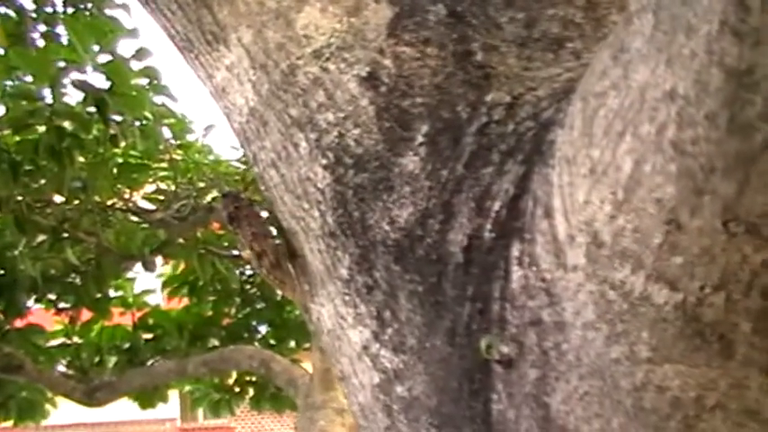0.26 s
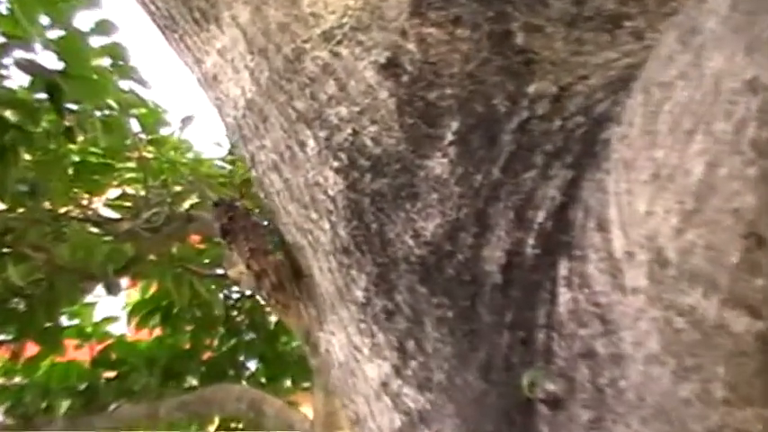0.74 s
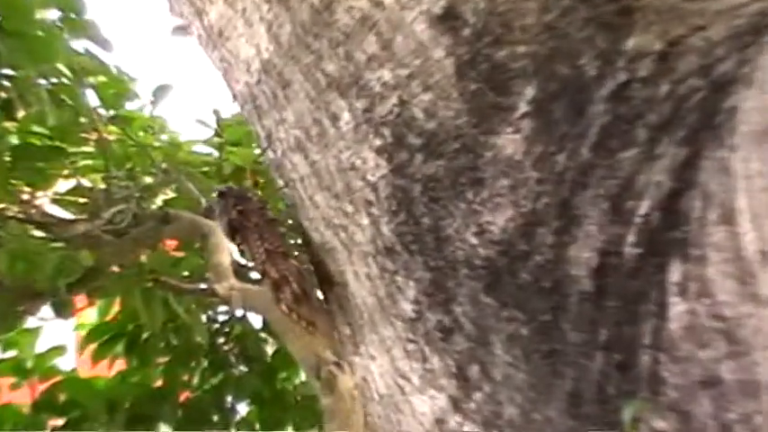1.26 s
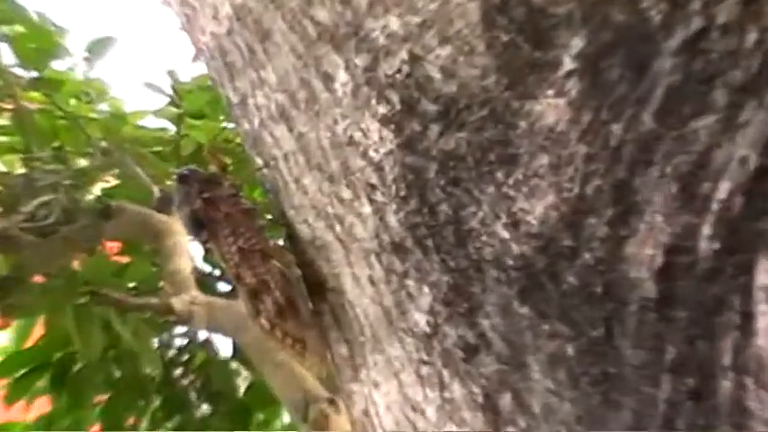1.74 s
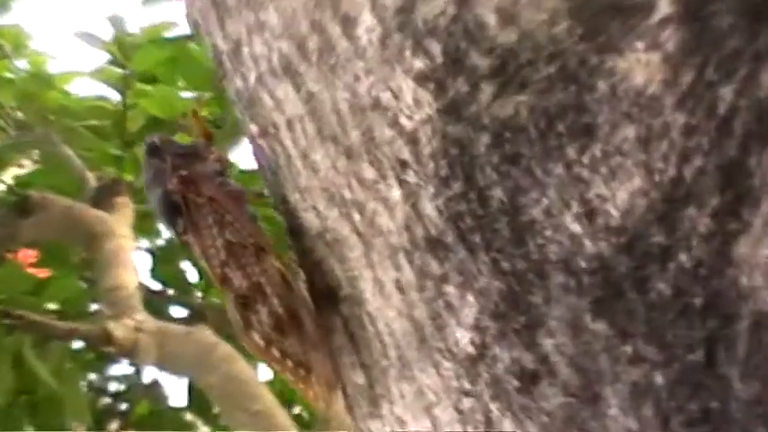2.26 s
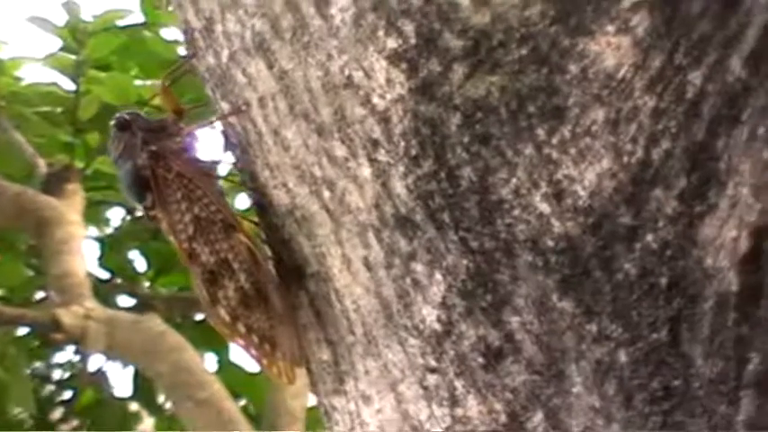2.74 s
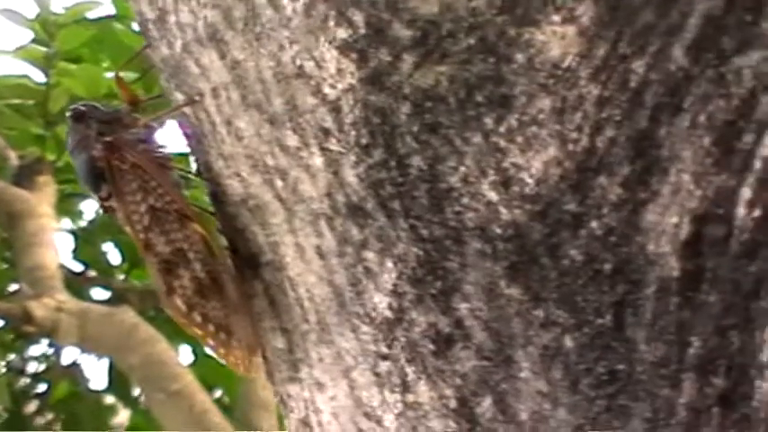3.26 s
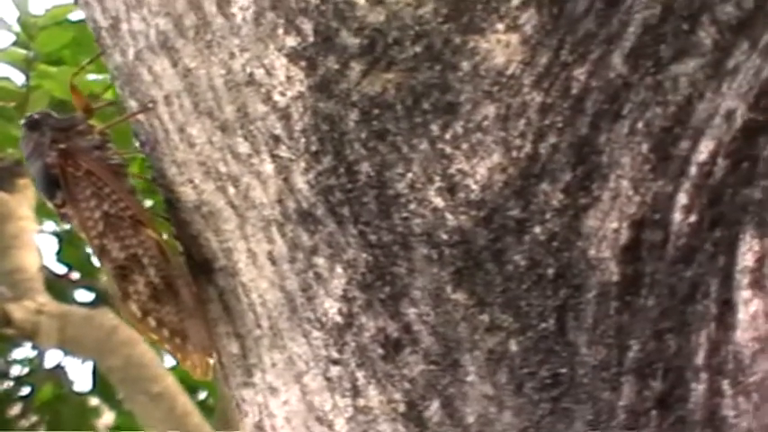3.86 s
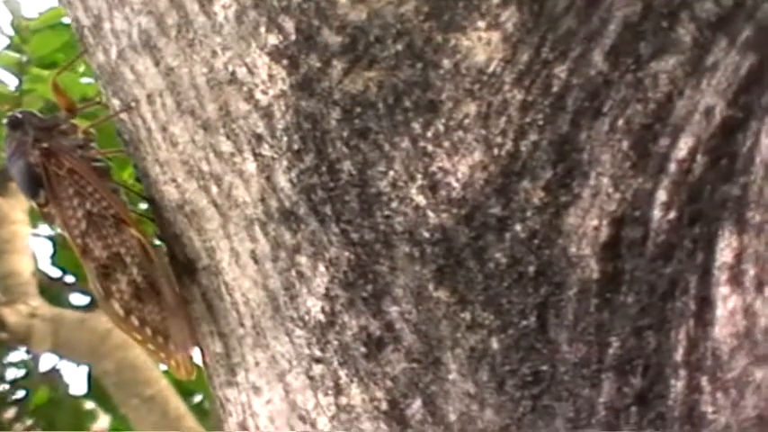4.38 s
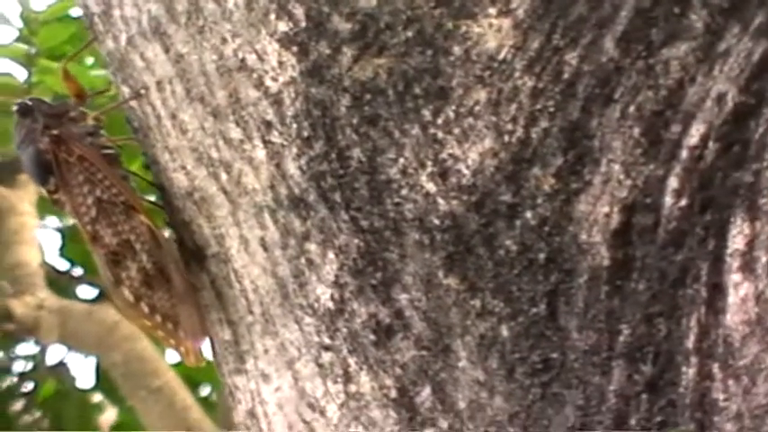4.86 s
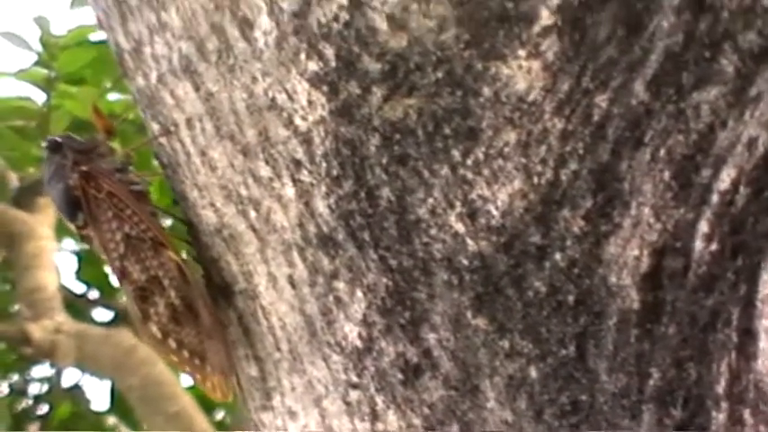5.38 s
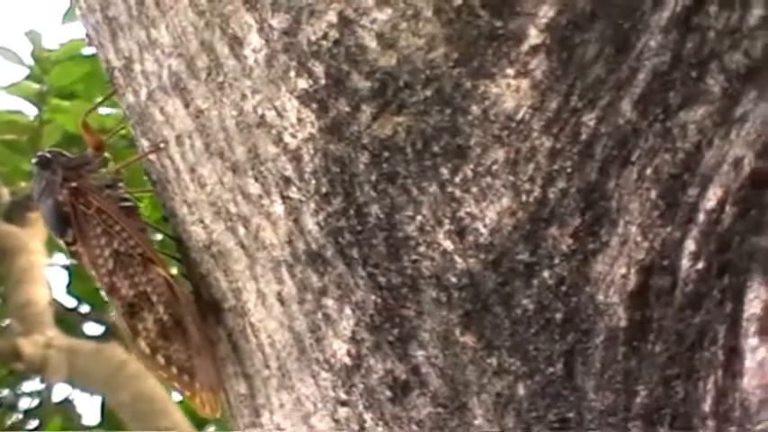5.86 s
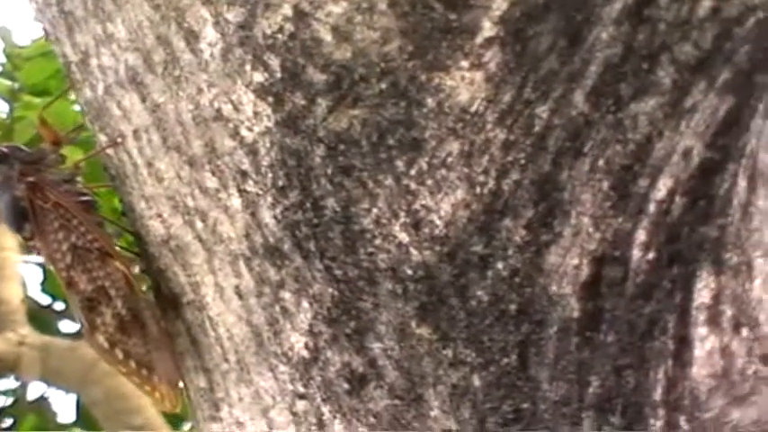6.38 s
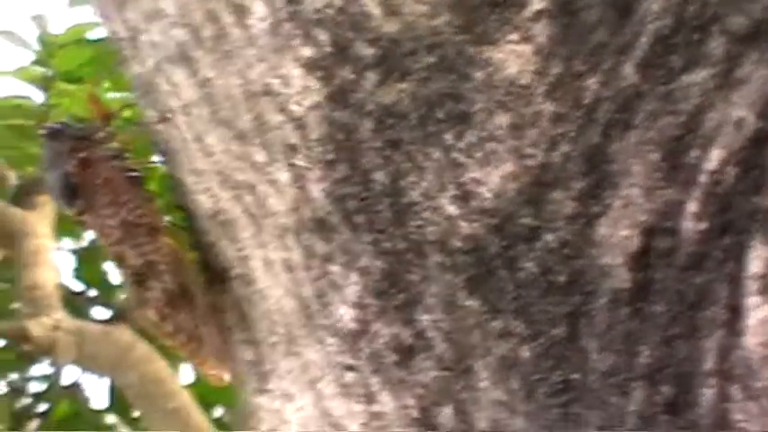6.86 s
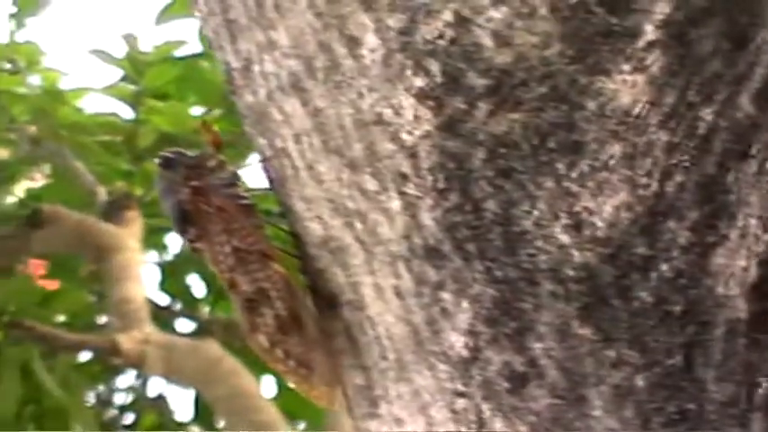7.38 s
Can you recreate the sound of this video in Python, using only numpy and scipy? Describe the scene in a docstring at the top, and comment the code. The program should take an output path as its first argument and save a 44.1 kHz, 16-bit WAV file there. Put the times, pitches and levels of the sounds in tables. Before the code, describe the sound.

Close bright insect clicks speed up into a steady rapid ticking outdoors, with distant cicadas hissing and soft tyre noise growing behind.

```python
"""On a tree trunk in a garden, close to the microphone, a cicada warms up its song with ever faster snaps.
Two tymbals take turns by bouts: each buckles, rings in damped modes, and pops back out about 3 ms later.
Fixed resonances of the nearby reflections prolong the snaps; trunk, leaves and a house wall return them
as decaying noise and an echo. Behind, filtered noise makes the far cicadas, the nearing car and the town;
wavering tones make a far motor."""
import sys
import numpy as np
from scipy import signal
from scipy.fft import rfft, irfft
from scipy.io import wavfile
from scipy.ndimage import uniform_filter1d

SR = 44100
rng = np.random.default_rng(int(sys.argv[2]) if len(sys.argv) > 2 else 0)


def persist_wave(psi):
    """Save psi, clipped to +-1, as 16-bit WAV."""
    counts = np.round(np.clip(psi, -1, 1) * 32767).astype(np.int16)
    wavfile.write(sys.argv[1], SR, np.atleast_2d(counts).T)


N = 336483  # samples in the scene


def undb(db):
    """Amplitude ratio: 20 dB for each factor of ten."""
    return 10 ** (np.asarray(db) / 20)


def unit(x):
    """Normalisation to an rms of 1."""
    return x / np.sqrt(np.mean(x ** 2))


def decay_60(time, t60):
    """Exponential decay: the amplitude falls by 60 dB in t60 (same unit as time)."""
    return np.exp(-np.log(1000) * time / t60)


def lowpass(x, hz, order=2):
    """Smooth loss of treble above a cutoff."""
    return signal.sosfilt(signal.butter(order, min(hz, SR / 2 - 1), fs=SR, output="sos"), x)


def highpass(x, hz, order=3):
    """Radiation efficiency: a small body radiates little bass."""
    return signal.sosfilt(signal.butter(order, hz, "high", fs=SR, output="sos"), x)


def colour(x, points):
    """Spectral shaping by a curve of (Hz, dB), straight on a logarithmic frequency axis."""
    hz, db = np.transpose(points)
    bins = np.maximum(np.arange(N // 2 + 1) * SR / N, 1)
    gain = undb(np.interp(np.log(bins), np.log(hz), db))
    return irfft(rfft(x) * gain, N)


def walk(rate):
    """Slow random modulation: levels held for 1 / rate seconds, smoothed twice, with an rms of 1."""
    hold = int(SR / rate)
    steps = np.repeat(rng.standard_normal(N // hold + 1), hold)
    smooth = uniform_filter1d(uniform_filter1d(steps, hold), hold)
    return unit(smooth[:N])


def stereo(mid, side, width):
    """Mid-side stereo: the side signal is added on the left and subtracted on the right."""
    return mid + width * side * np.array([[1], [-1]])


def wash(points, width):
    """Diffuse sound field: coloured, partly correlated stereo noise with an rms of 1."""
    mid, side = colour(rng.standard_normal((2, N)), points)
    return unit(stereo(mid, side, width))


def town():
    """Distant rumble: steady broadband noise dominated by bass."""
    # Each row: frequency in Hz, relative spectral density in dB.
    town_spectrum = [(20, -20), (42, 3), (72, -6), (102, 1), (140, -0.5), (200, 0.5), (270, 1.5), (340, -1),
                     (420, -7), (700, -20), (2000, -33), (16000, -55)]
    return wash(town_spectrum, width=0.2) * undb(-50)


def motor(flutter_rate=14):
    """Far drone: narrowband tones whose amplitude and phase waver at random, so each fades in and out."""
    # Each row: frequency in Hz, level in dB.
    drone_lines = [(44, -62.5), (102, -58), (126, -59.5), (172, -60), (228, -59), (272, -58), (325, -58.5)]
    t = np.arange(N) / SR
    drone = np.zeros(N)
    for hz, db in drone_lines:
        envelope = walk(flutter_rate) + 1j * walk(flutter_rate)
        drone += undb(db) * np.real(envelope * np.exp(2j * np.pi * hz * t))
    return drone


def car():
    """Tyre noise: broadband noise whose level grows as the car draws near."""
    # Each row: time in seconds, level in dB before a lift of 2.5 dB.
    approach = [(0.1, -56.5), (1.17, -55), (4.99, -50), (5.32, -45), (7.63, -38)]
    # Each row: frequency in Hz, relative spectral density in dB.
    tyre_spectrum = [(25, -7), (45, -6.5), (75, -10), (150, -5.5), (300, -3), (600, -1), (1100, -3),
                     (1550, -6.5), (1900, -12.5), (2500, -17.5), (4000, -23), (16000, -48)]
    level_db = np.interp(np.arange(N) / SR, *np.transpose(approach))
    return wash(tyre_spectrum, width=0.31) * undb(level_db + 2.5)


def chorus():
    """Far cicadas: incoherent songs merge into a hiss whose level wavers slightly."""
    # Each row: frequency in Hz, relative spectral density in dB.
    chorus_spectrum = [(1500, -14.5), (2700, 0), (3600, -4), (5200, 7), (6200, 5.5), (7500, 0), (9000, -10),
                       (10500, -14), (13000, -12), (16000, -21)]
    return wash(chorus_spectrum, width=0.19) * undb(-50 + .5 * walk(9))


def whine():
    """One far cicada: a band of noise, amplitude-modulated so that it swells and sinks."""
    # Each row: frequency in Hz, relative spectral density in dB.
    whine_spectrum = [(6000, -40), (7800, -8), (8800, 0), (9500, -9), (11500, -40)]
    return wash(whine_spectrum, width=.2) * undb(-66 + 4 * walk(8))


def background():
    """Superposition of the distant sources."""
    return town() + motor() + car() + chorus() + whine()


def twitches():
    """Alternating excitation: rows of snap time in seconds, tymbal whose turn it is, place in the bout."""
    # Snaps, driven alike because the ribs always give way at the same load. Each row: start in seconds.
    snap_times = [0.0451, 0.2771, 0.3995, 0.6151, 0.703, 0.7627, 0.8353, 0.9621, 1.218, 1.2684, 1.3645,
                  1.5055, 1.6749, 1.7346, 1.7754, 1.8526, 1.9094, 1.977, 2.1126, 2.206, 2.3447, 2.4044,
                  2.4641, 2.525, 2.576, 2.6221, 2.669, 2.729, 2.782, 2.8337, 2.9276, 2.9946, 3.061, 3.1195,
                  3.216, 3.2799, 3.3379, 3.3904, 3.4915, 3.5655, 3.6058, 3.6593, 3.7296, 3.776, 3.8268,
                  3.8855, 3.95, 4.0077, 4.0733, 4.1363, 4.1861, 4.2376, 4.298, 4.397, 4.4587, 4.5177,
                  4.6332, 4.696, 4.7554, 4.8305, 4.8803, 4.9394, 4.991, 5.0959, 5.1563, 5.265, 5.3344,
                  5.3829, 5.4335, 5.4913, 5.5467, 5.601, 5.6932, 5.7534, 5.8015, 5.863, 5.9088, 5.9647,
                  6.0305, 6.077, 6.1293, 6.1816, 6.2322, 6.3147, 6.3562, 6.4169, 6.4636, 6.516, 6.5702,
                  6.6153, 6.66, 6.7085, 6.757, 6.8141, 6.8546, 6.9049, 6.9415, 6.9995, 7.0407, 7.0847,
                  7.1136, 7.154, 7.2024, 7.2418, 7.2488, 7.2965, 7.3458, 7.4006, 7.4074, 7.4794, 7.5257,
                  7.5787]
    # Bouts, in which the tymbals take turns, tymbal 1 first. Each row: start in seconds.
    bout_starts = [0, .2, .5, 1.1, 1.6, 1.88, 2.3, 2.7, 3.1, 3.45, 3.8, 4.35, 4.73, 5.2, 5.52, 6.1, 6.55,
                   7.18, 7.404, 7.45, 7.55]
    times = np.sort(snap_times)
    bout = np.searchsorted(bout_starts, times)
    place = np.arange(len(times)) - np.searchsorted(bout, bout)
    return list(zip(times, bout % 2, place))


def ring(ms, hz, t60_ms, db, give_ms):
    """Modal excitation: damped modes start as the ribs give way; neighbours swing in opposite senses."""
    ms = np.maximum(ms, 0)  # silent before the onset
    size = (-1) ** np.arange(len(hz)) * undb(db)
    swings = decay_60(ms, t60_ms[:, None]) * np.sin(2 * np.pi * hz[:, None] * ms / 1000)
    onset = 1 - np.exp(-ms / give_ms)
    return size @ swings * onset


def knock(ms, tension):
    """Dull thorax knock: a damped resonance whose pitch rises as the muscle tightens."""
    hz, t60_ms, db = 1840 * tension ** .6, 16, -38.5
    return undb(db) * decay_60(ms, t60_ms) * np.sin(2 * np.pi * hz * ms / 1000)


def cicada(give_ms=0.16, radiation_hz=2900, tymbal_db=(0.7, 0.6)):
    """Snap-through buckling: each twitch buckles a tymbal, which pops back; one track per tymbal."""
    # Modes of each tymbal. Each row: frequency in Hz, 60 dB decay time in ms,
    # relative level on buckling in dB, relative level on popping out in dB.
    modes_0 = [(3426,3.8,-14.5,-63), (4255,3.4,-4,-17.5), (5360,2.3,3.0,-12), (5720,5.72,-1.5,-16),
               (5783,2.58,-3,-18), (9050,1.15,-1,-7.5), (10460,3.67,-8.5,-8), (13150,1.2,-16,-34)]
    modes_1 = [(4140,1.09,4,-5.5), (3988,2.56,2,-11), (4870,2.26,2,-15), (5340,6.26,-3.5,-17),
               (6110,3.16,-19,-21), (9405,1.19,3,0.9), (10500,3.7,-6,-3), (13100,0.44,2.5,2.5)]
    # The time from buckling to popping out shortens with warmth and with each snap of a bout.
    hold_ms, warming_ms_per_s, hurry_ms_per_snap = 3.12, .039, .018
    rise_per_s = .0004  # share of the pitch gained per second of warming
    scatter_db, detune, scatter_ms = .25, .003, .025  # random spread from snap to snap; detune is a share

    length = SR // 40
    ms = np.arange(length) * 1000 / SR
    tracks = np.zeros((2, N + SR))
    snaps = twitches()
    chance = rng.standard_normal((len(snaps), 4))
    for (start_s, side, place), (loud, tune, pop, late) in zip(snaps, chance):
        hold = hold_ms - warming_ms_per_s * start_s - hurry_ms_per_snap * place
        hold += scatter_ms * late
        hz, t60_ms, in_db, out_db = np.array((modes_0, modes_1)[side], float).T
        hz = hz * (1 + rise_per_s * (start_s - N / SR / 2) + detune * tune)  # rises about mid-scene
        buckle = ring(ms, hz, t60_ms, in_db, give_ms)
        rebound = ring(ms - hold, hz, t60_ms, out_db + scatter_db * pop, give_ms)
        snap = highpass(buckle + rebound, radiation_hz) + knock(ms, hold_ms / hold)
        start = int(start_s * SR)
        tracks[side, start:start + length] += snap * undb(tymbal_db[side] + scatter_db * loud)
    return tracks[:, :N]


def early_reflections(x):
    """Place resonance: fixed early reflections near the trunk colour each snap and ring on."""
    # Each row: frequency in Hz, 60 dB decay time in seconds, level in dB.
    place_modes = [(4304, 0.017, -4.5), (4696, 0.019, -6.5), (5225, 0.052, -2.5), (5466, 0.039, -0.5)]
    t = np.arange(SR // 10) / SR
    response = np.zeros(len(t))
    for hz, t60, db in place_modes:
        decay = decay_60(t, t60)
        response += undb(db) * 2 * decay / decay.sum() * np.cos(2 * np.pi * hz * t)  # gain db at resonance
    return x + signal.fftconvolve(x, response)[:N]


def garden(x, near_db=-16, near_t60=0.053, far_db=-20.5, far_t60=0.26, width=0.42,
           dull_hz=9000, wall_hz=6000):
    """Scattering and reflection: quick trunk and branch scatter, a faint leaf tail, one house-wall echo."""
    wall_s, wall_db = .0583, -25.5
    t = np.arange(SR // 2) / SR
    mid, side = rng.standard_normal((2, len(t)))
    power = np.zeros(len(t))
    for db, t60 in ((near_db, near_t60), (far_db, far_t60)):
        decay = decay_60(t, t60) * (t > .002)  # scatter starts after 2 ms
        power += undb(2 * db) * decay ** 2 / np.sum(decay ** 2)
    scatter = lowpass(np.sqrt(power) * stereo(mid, side, width), dull_hz)
    impulse = 1. * (np.arange(len(t)) == int(wall_s * SR))
    wall = undb(wall_db) * lowpass(impulse, wall_hz)
    return signal.fftconvolve(x[None], scatter + wall, axes=1)[:, :N]


def scene(turned_db=3.5):
    """Directivity: tymbal 0 is turned away from the microphone, so it sends more into the garden."""
    turned, facing = (early_reflections(track) for track in cicada())
    reflected = garden(undb(turned_db) * turned + facing)
    return turned + facing + reflected + background()


def port(x, sense):
    """Stereo difference: a microphone port (1 left, -1 right) takes half of the level and phase gap."""
    # Each row: frequency in Hz, left minus right level in dB, phase lead of the left in radians.
    port_gap = [(100, .6, 0), (400, 0, -.05), (1500, -2, -.15), (2500, -.3, .1), (3800, -1, .4),
                (4300, 1, .5), (4800, 2.7, .38), (6000, 1.7, .12), (8000, .5, 0), (10800, .3, 0),
                (13300, -3.5, .5), (16000, .5, .2)]
    hz, db, lead = np.transpose(port_gap)
    bins = np.arange(N // 2 + 1) * SR / N
    difference = np.log(undb(np.interp(bins, hz, db))) + 1j * np.interp(bins, hz, lead)
    return irfft(rfft(x) * np.exp(sense * difference / 2), N)


def record(dry):
    """Microphone response: each port colours the sound, peaks clip at full scale, a lowpass cuts the top."""
    top_hz = 16000
    ports = np.array([port(dry[0], 1), port(dry[1], -1)])
    top_cut = signal.ellip(8, .2, 70, top_hz, fs=SR, output="sos")
    return signal.sosfilt(top_cut, np.clip(ports, -1, 1))


dry = scene()
out = record(dry)
persist_wave(out)
```